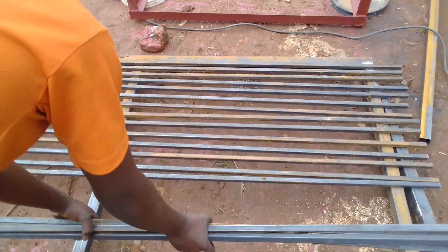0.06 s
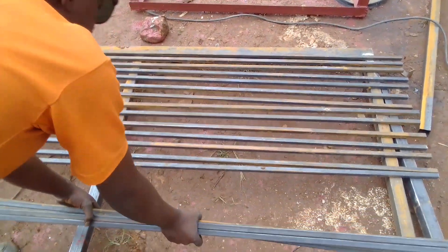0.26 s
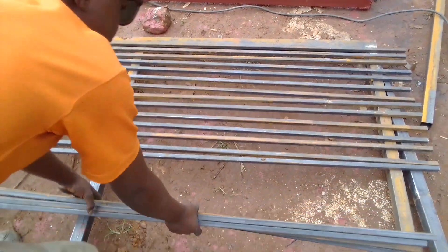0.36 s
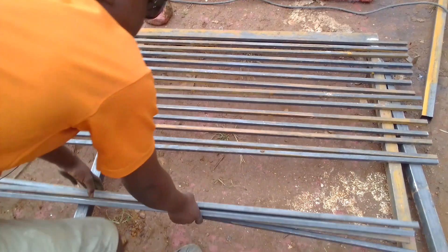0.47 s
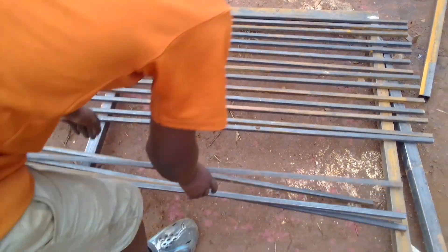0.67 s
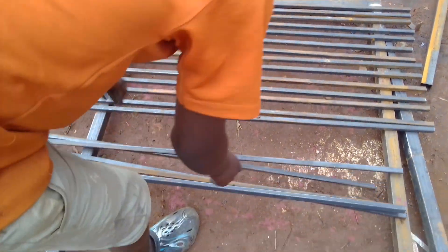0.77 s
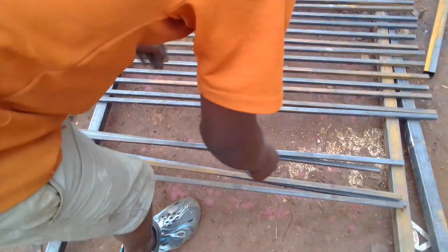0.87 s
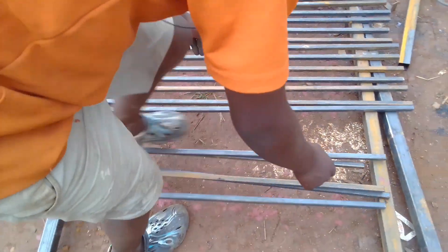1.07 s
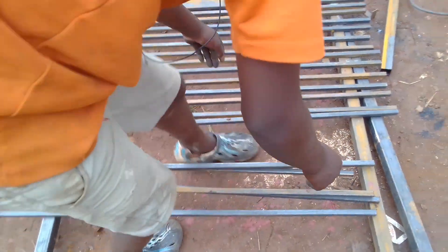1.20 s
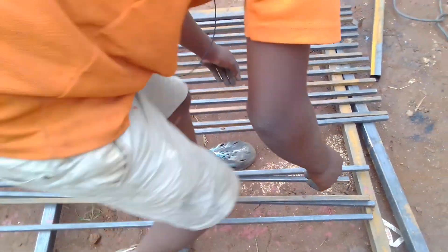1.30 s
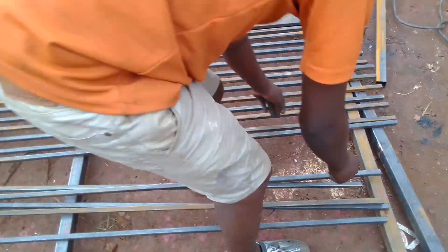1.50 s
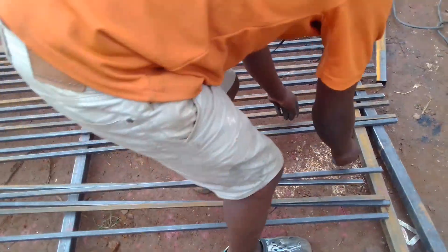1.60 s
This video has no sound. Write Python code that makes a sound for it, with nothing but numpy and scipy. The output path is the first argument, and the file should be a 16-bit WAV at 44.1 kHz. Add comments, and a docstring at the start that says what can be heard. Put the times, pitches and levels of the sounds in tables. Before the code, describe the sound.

Thin steel bars clatter close by over faint outdoor air. Light ticks lead to short, damped clanks on a metal frame from 0.2 seconds. At 0.5 seconds the bars come loose, rolling and ringing brightly against each other with brief high squeals and faint thuds. Sharper knocks stand out near 0.7, 1.0 and 1.3 seconds. The rattle fades from about 1.2 seconds, settling to quiet chatter by 1.6.

```python
"""Steel bars spread on a frame

A bundle of thin steel bars is set down on a welded frame outdoors and spread out by hand.
Held together, the bars tick, clank and choke quickly; let go, they roll and chatter against each
other, ringing freely, then settle. Skidding edges squeal, and the frame thuds faintly on the ground."""
import sys
import numpy as np
from scipy import signal
from scipy.fft import irfft
from scipy.io import wavfile
from scipy.ndimage import uniform_filter1d

SR = 44100
rng = np.random.default_rng(int(sys.argv[2]) if len(sys.argv) > 2 else 0)


def bounce(signal):
    """Save signal as a 16-bit WAV file at the path given by the first command-line argument."""
    frames = np.transpose(np.atleast_2d(signal))
    limited = np.clip(frames, -1, 1)
    pcm = np.round(limited * 32767).astype(np.int16)
    wavfile.write(sys.argv[1], SR, pcm)


N = 72765

# Light ticks in the hand. Each row: start in seconds, level in dB, chatter decay in seconds.
HAND_TICKS = [(.0149, -52, 0.01), (.0428, -48.5, 0.0059), (0.067, -55, .012), (0.1142, -35, 0.005),
              (0.1347, -35.5, 0.0026), (0.145, -49, 0.024), (.2005, -71, .003)]
# Clanks of the held bundle on the frame, then knocks among the loose bars.
# Each row: start in seconds, level in dB, chatter decay in seconds, low-mid boost in dB.
BUNDLE_CLANKS = [(.2247, -14, 0.019, 0.5), (.252, -26, 0.039, 0), (.2683, -12, 0.042, -2),
                 (.3115, -16.5, 0.036, 1), (.348, -32, 0.017, 13), (.361, -32, 0.012, 6),
                 (.3716, -24, 0.021, 4), (.402, -27.5, 0.02, 3.5), (.4170, -24, 0.025, 4.5),
                 (.433, -32, 0.0067, 9.5), (.4980, -15, 0.008, 0), (.5057, -14, 0.025, -5)]
LOOSE_KNOCKS = [(.5277, -10, 0.008, -17), (.5375, -19, 0.023, 6), (.668, -8.5, 0.023, 2),
                (.9737, -11.5, 0.015, -0.5), (1.3349, -15.5, .015, -6), (1.5718, -32, 0.0044, 7)]
# Swell and fade of the rolling chatter. Each row: time in seconds, treble in dB, low mids in dB.
ROLL_LEVELS = [(.505, -45, -45), (.514, -31, -29), (0.541, -9, -21.5), (.62, -12, -19.5), (.666, -9, -20.5),
               (.72, -9.5, -19.5), (.76, -11, -20.5), (.854, -9.5, -21.5), (0.918, -14, -23.5),
               (0.937, -23.5, -34), (.958, -19, -27), (.984, -14.5, -28), (1.054, -11, -21.5),
               (1.19, -15, -20.5), (1.26, -17.5, -24.5), (1.325, -21, -26.5), (1.355, -18, -26.5),
               (1.39, -24, -29), (1.45, -29.5, -32), (1.535, -32.5, -33), (1.573, -34, -30),
               (1.60, -38.5, -47), (1.65, -34, -30.5)]
# Single bars left to sing. Each row: start in seconds, pitch in Hz, level in dB, t60 in seconds.
SINGING_BARS = [(0.2696, 1215, -20.5, 0.39), (.30, 6135, -23, 0.35), (.575, 3655, -22, .25),
                (.60, 5440, -24, 0.6), (.67, 2462, -19, .4), (.77, 5060, -25, .3),
                (.975, 7755, -14.5, 0.46), (.975, 5045, -31, 0.23), (.975, 2432, -28, .4),
                (1.05, 3016, -21, .3), (1.08, 4404, -25, 0.71), (1.19, 915, -35, 0.77),
                (1.35, 6033, -28, 0.69)]
# Bar edges skidding over each other. Each row: start in seconds, length in seconds, level in dB,
# squeal pitch in Hz, high sizzle relative to the squeal in dB.
EDGE_SKIDS = [(0.369, 0.01, -23, 9900, -18), (0.527, 0.067, -13.5, 9700, -3),
              (0.611, 0.12, -16, 9660, -3.5), (1.007, 0.048, -21, 8240, -2),
              (1.195, 0.11, -30.5, 10030, -5), (1.551, 0.04, -28.5, 5690, -6.5)]
# Thuds of the frame.
# Each row: start in seconds, level in dB, decay in seconds, highest strongly stirred pitch in Hz.
FRAME_THUDS = [(.555, -46, .035, 220), (.669, -28, .014, 520), (.716, -39, .018, 70), (.83, -43, .035, 130),
               (.90, -45, .035, 150), (1.07, -42, .025, 105), (1.325, -47, .02, 200)]

# Resonances of the held bundle, the loose bars, the low-mid ring of the rolling bars, and the frame.
# Each row: pitch in Hz, relative level in dB.
BUNDLE_MODES = [(950, -11), (1217, -4.5), (1620, -9), (1850, -0.5), (2140, -6), (2406, 0), (2700, -0.5),
                (3020, -6), (3400, 1), (3671, 0.5), (4091, -10), (4393, -2), (4727, 0.5), (5130, 1.5),
                (5437, 2.5), (6137, -6), (6700, -7), (7020, 1), (7397, 6.5), (7800, -1), (8300, 5),
                (8700, -17), (9044, -23), (9480, -19), (9701, 10)]
LOOSE_MODES = [(2431, 2), (2470, 2.5), (2535, -1), (2610, 2), (2720, -1.5), (3022, -1), (3330, -1),
               (3654, 1.5), (3790, -7), (4020, -3.5), (4250, -4), (4407, 1), (4740, -0.5), (5062, 7),
               (5145, -2.5), (5465, 2), (5590, -4), (5839, 1.5), (6030, -0.5), (6230, -4), (6643, 3),
               (6990, 2.5), (7090, 6), (7450, 5.5), (7759, 7.5), (7848, 1.5), (8129, -5), (8228, 8),
               (8473, 4.5), (8802, 5.5), (9098, 2), (9400, -17), (9680, 1), (9780, 4.5), (9997, -6)]
LOW_MODES = [(925, -6.5), (1250, -12), (1388, -1.5), (1513, 1.5), (1650, 2.5), (1798, 0), (1895, 4.5),
             (2120, 4)]
FRAME_MODES = [(56, -1), (98, -2), (165, 0), (235, -5), (345, -1), (410, -1)]
# Tone colours of the air, the ticks, the held bundle, the bright high sizzle and the loose bars.
# Each row: frequency in Hz, relative level in dB.
AIR_COLOUR = [(25, 8.5), (60, 9), (120, -11), (300, -2.5), (850, -9.5), (1250, -16), (1450, -7.5),
              (2500, -12), (5500, -12), (8500, -11), (10100, -16), (11500, -16), (16000, -28)]
TICK_COLOUR = [(470, -66), (800, -42), (2100, -26), (4340, -23.5), (5110, -13.5), (6090, -15), (8340, -19),
               (9690, -6), (11300, -26), (14100, -29), (16000, -29)]
BUNDLE_COLOUR = [(40, -58), (120, -43), (300, -24), (550, -13), (900, -2), (1600, 4.5), (2100, -2.5),
                 (3500, 0.5), (6000, -0.5), (8500, 0.5), (10100, -1.5), (11400, -19), (16000, -25.5)]
SIZZLE_COLOUR = [(1000, -49), (4000, -25), (7000, -1), (10000, 10), (11500, 3.5), (16000, -6.5)]
LOOSE_COLOUR = [(40, -65), (120, -39.5), (300, -18.5), (550, -17), (900, -6.5), (1500, -1.5), (2200, -1.5),
                (2520, -1), (2950, 0), (4200, -2), (5200, -1.5), (6200, -1.5), (8000, -3), (9200, -7),
                (9900, -1), (10700, -8.5), (11800, -17), (16000, -25)]

BAR_COUNT, BEND_COUNT, DETUNE_HZ = 7, 170, 19.85
CONTACTS_PER_S, SPREAD_DB = 1000, 3.5
LOW_CUT_HZ, CROSSOVER_HZ, BAND_LIMIT_HZ = 150, 2450, 16200
DULLING, TOP_HZ, HARD_DB = 0.51, 7300, -6  # above TOP_HZ, dB lost per dB the roll is under HARD_DB


def amp(db):
    """Decibels to gain."""
    return 10 ** (np.asarray(db) / 20)


def unit(x):
    """Scales to energy 1."""
    return x / np.sqrt(np.sum(x ** 2) + 1e-20)


def tinted(x, colour):
    """Shapes a sound with a minimum-phase EQ curve and scales it to energy 1."""
    hz, db = np.transpose(colour)
    bin_hz = abs(np.fft.fftfreq(4096, 1 / SR))
    log_gain = np.log(amp(np.interp(np.log(bin_hz + 1), np.log(hz), db)))
    taps = np.fft.ifft(np.exp(np.conj(signal.hilbert(log_gain)))).real[:2048]
    return unit(signal.fftconvolve(x, taps)[:len(x)])


def band(x, kind):
    """One side of the crossover: "low" for the low mids, "high" for the treble."""
    return signal.sosfilt(signal.butter(4, CROSSOVER_HZ, kind, fs=SR, output="sos"), x)


def burst(start, decay):
    """Instant attack, exponential release."""
    t = np.arange(N) / SR - start
    return (t >= 0) * np.exp(-np.maximum(t, 0) / max(decay, 1e-3))


def outdoor_air(level_db=-54):
    """A faint, steady bed of outdoor noise."""
    return amp(level_db) * tinted(rng.standard_normal(N), AIR_COLOUR) * np.sqrt(N)


def ringing(modes, t60):
    """Clear modes, a little off pitch from bar to bar; t60 holds at 3 kHz, higher ones die sooner."""
    t = np.arange(SR // 3) / SR
    hz, db = np.transpose(modes)
    detuned = hz + DETUNE_HZ * rng.standard_normal(len(hz))
    out = np.zeros(len(t))
    for pitch, gain, phase in zip(detuned, amp(db), rng.random(len(hz))):
        fade = amp(-60 * t / t60 * (pitch / 3000) ** 0.78)
        out += gain * fade * np.sin(2 * np.pi * (pitch * t + phase))
    return unit(out)


def struck_bar(colour, modes, clash_t60, bend_t60, bend_db, mode_t60, mode_db):
    """One bar's answer to a contact: a short clash, a thicket of bending modes and a few clear ones."""
    t = np.arange(SR // 3) / SR
    clash = tinted(rng.choice([-1., 1.], len(t)) * amp(-60 * t / clash_t60), colour)
    # The bending modes crowd toward the low end of the band.
    places = ((np.arange(BEND_COUNT) + rng.random(BEND_COUNT)) / BEND_COUNT) ** 1.5
    bins = (places * BAND_LIMIT_HZ * len(t) / SR).astype(int)
    spectrum = np.zeros(len(t) // 2 + 1, complex)
    spectrum[bins] = places ** (1 / 6) * np.exp(2j * np.pi * rng.random(BEND_COUNT))
    bending = tinted(irfft(spectrum, len(t)) * amp(-60 * t / bend_t60), colour)
    return unit(clash + amp(bend_db) * bending + amp(mode_db) * ringing(modes, mode_t60))


def contacts(starts=()):
    """Irregular steel-on-steel contacts of even power, with a firm one at each start."""
    size = amp(SPREAD_DB * np.minimum(rng.exponential(1, N), 3))
    size *= rng.random(N) < CONTACTS_PER_S / SR
    size /= np.sqrt(np.maximum(uniform_filter1d(size ** 2, SR // 120), 1e-3))
    for start in starts:
        size[round(start * SR)] = 13
    return size * rng.choice([-1., 1.], N)


def chatter(force, bars):
    """Each contact sets one of the bars ringing, picked at random."""
    which = rng.integers(0, len(bars), N)
    return sum(signal.fftconvolve(force * (which == k), bar)[:N] for k, bar in enumerate(bars))


def blows(rows, bars):
    """Each blow is a hard contact followed by dying chatter."""
    force = contacts([row[0] for row in rows])
    treble_power, low_power = np.zeros((2, N))
    for start, db, decay, boost_db in rows:
        envelope = amp(db) * burst(start - 1 / SR, decay)
        treble_power += envelope ** 2
        low_power += (amp(boost_db) * envelope) ** 2
    treble = band(chatter(force * np.sqrt(treble_power), bars), "high")
    return treble + band(chatter(force * np.sqrt(low_power), bars), "low")


def held_bundle():
    """Ticks in the hand, then clanks on the frame, all choked by the grip."""
    grip = dict(modes=BUNDLE_MODES, bend_t60=0.11, mode_t60=0.09)
    light = [struck_bar(TICK_COLOUR, clash_t60=0.02, bend_db=-1, mode_db=-15, **grip)
             for _ in range(4)]
    heavy = [struck_bar(BUNDLE_COLOUR, clash_t60=0.035, bend_db=-2.5, mode_db=-1.5, **grip)
             for _ in range(6)]
    ticks = blows([(*row, 0) for row in HAND_TICKS], light)  # no low-mid boost
    return ticks + blows(BUNDLE_CLANKS, heavy)


def singing_bars():
    """Here and there one mode of a bar rings on through the clatter."""
    t, out = np.arange(N) / SR, np.zeros(N)
    for start, hz, db, t60 in SINGING_BARS:
        envelope = burst(start, t60 / np.log(1000)) - burst(start, 0.0067)  # softened attack
        out += amp(db) * envelope * np.sin(2 * np.pi * (hz * t + rng.random()))
    return out


def skidding_edges(squeal_width_hz=330):
    """Each skid excites one broad, squealing resonance; a bright high sizzle tops the loudest clatter."""
    t, out = np.arange(N) / SR, np.zeros(N)
    sizzle = tinted(signal.unit_impulse(2048), SIZZLE_COLOUR)
    age = t[:len(sizzle)]
    for start, length, db, hz, sizzle_db in EDGE_SKIDS:
        squeal = unit(np.exp(-np.pi * squeal_width_hz * age) * np.sin(2 * np.pi * hz * age))
        arch = np.sqrt(np.maximum(1 - (2 * (t - start) / length - 1) ** 2, 0))
        noise = rng.standard_normal(N) * arch
        out += amp(db) * signal.fftconvolve(noise, unit(squeal + amp(sizzle_db) * sizzle))[:N]
    return out


def loose_bars():
    """The freed bars roll, knock and ring; gentler contacts sound duller."""
    bars = [struck_bar(LOOSE_COLOUR, LOOSE_MODES, clash_t60=0.02, bend_t60=0.23, bend_db=-1.5,
                       mode_t60=0.19, mode_db=3.5) for _ in range(BAR_COUNT)]
    low_bars = [struck_bar(LOOSE_COLOUR, LOW_MODES, clash_t60=0.038, bend_t60=0.21, bend_db=1.5,
                           mode_t60=0.23, mode_db=-7) for _ in range(BAR_COUNT)]
    times, treble_db, low_db = np.transpose(ROLL_LEVELS)
    t, force = np.arange(N) / SR, contacts()
    treble_gain, low_gain = (amp(np.interp(t, times, db, left=-120)) for db in (treble_db, low_db))
    bright = chatter(force * treble_gain, [unit(band(bar, "high")) for bar in bars])
    bright += blows(LOOSE_KNOCKS, bars)
    body = chatter(force * low_gain, [unit(band(bar, "low")) for bar in low_bars])
    top = signal.sosfiltfilt(signal.butter(3, TOP_HZ, "high", fs=SR, output="sos"), bright)
    # The dulling skips the roll's fade-in, so the first knocks stay crisp.
    softness_db = np.minimum(np.interp(t, times[2:], treble_db[2:]) - HARD_DB, 0)
    return bright + top * (amp(DULLING * softness_db) - 1) + body


def frame_thuds():
    """Dull thuds: a soft blow stirs only the lowest modes of the frame, a hard one all of them."""
    t, out = np.arange(N) / SR, np.zeros(N)
    hz, mode_db = np.transpose(FRAME_MODES)
    for start, db, decay, top_hz in FRAME_THUDS:
        shares = unit(amp(mode_db) / (1 + (hz / top_hz) ** 4))
        ring = shares @ np.sin(2 * np.pi * (hz[:, None] * t + rng.random((len(hz), 1))))
        out += amp(db) * (burst(start, decay) - burst(start, 0.0016)) * ring
    return out


def scene():
    """Bars, frame and air in one close mono mix."""
    bars = held_bundle() + loose_bars() + singing_bars() + skidding_edges()
    return (bars + frame_thuds() + outdoor_air())[None]


def record(dry):
    """Soft clipping rounds off the loudest peaks; then the rumble and the extreme top are trimmed."""
    ceiling = 0.68
    rounded = dry / (1 + (dry / ceiling) ** 8) ** (1 / 8)
    thinned = signal.sosfilt(signal.butter(2, LOW_CUT_HZ, "high", fs=SR, output="sos"), rounded)
    high_cut = signal.firwin(511, BAND_LIMIT_HZ, window=("kaiser", 9), fs=SR)
    return signal.oaconvolve(thinned, high_cut[None], "same")


dry = scene()
out = record(dry)
bounce(out)
```